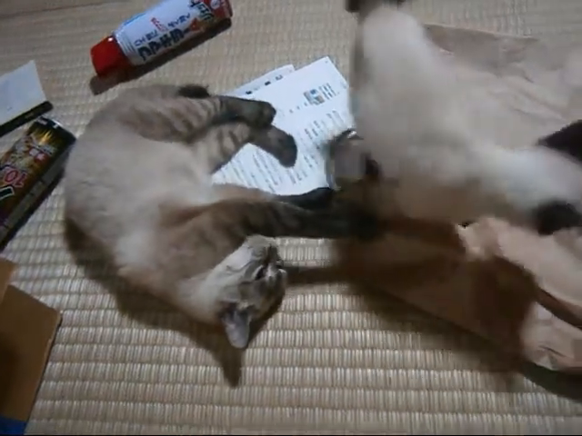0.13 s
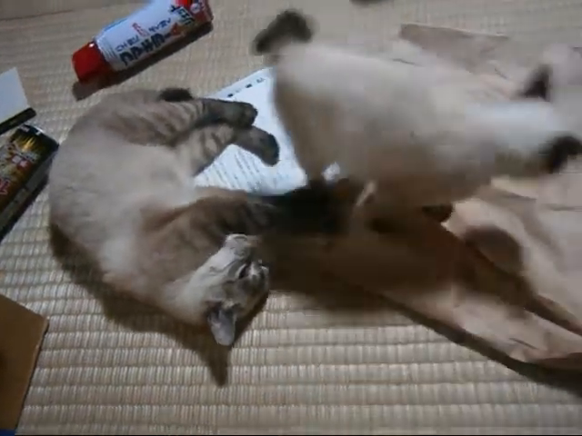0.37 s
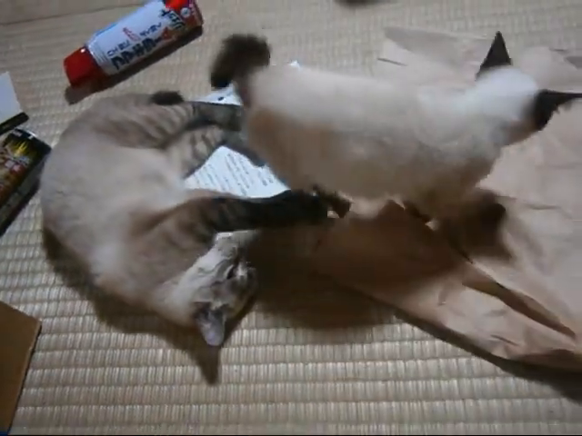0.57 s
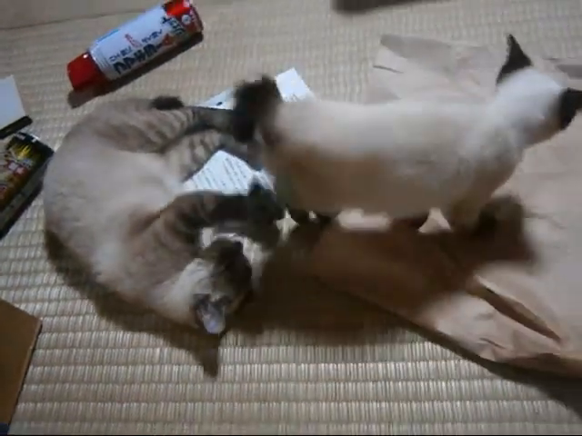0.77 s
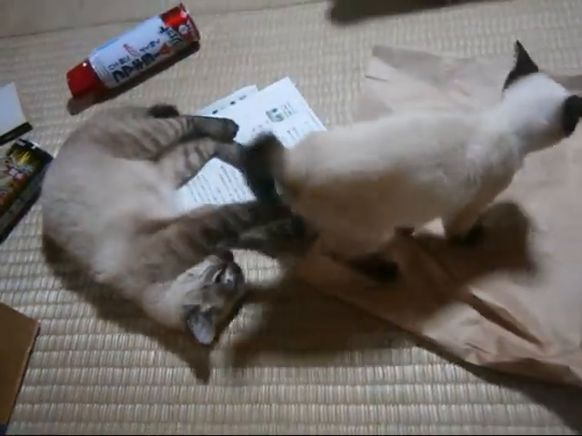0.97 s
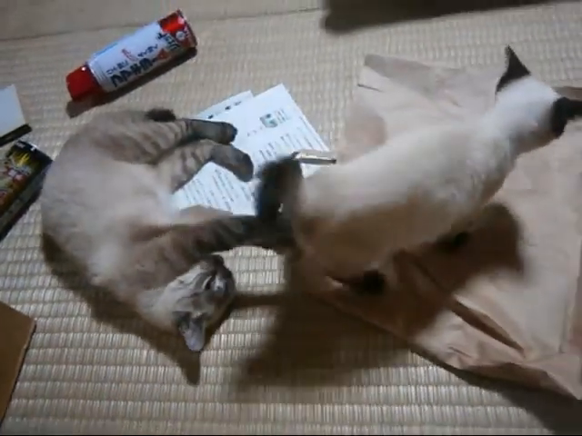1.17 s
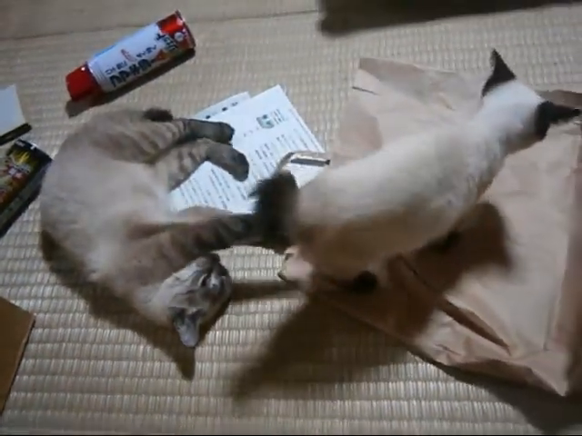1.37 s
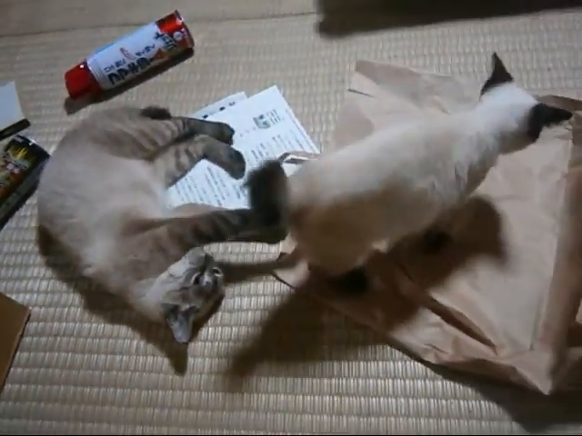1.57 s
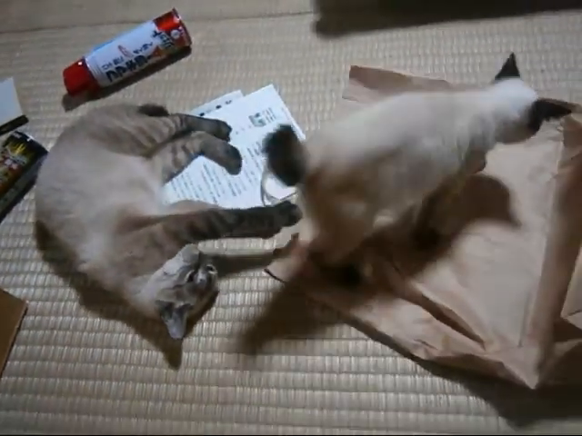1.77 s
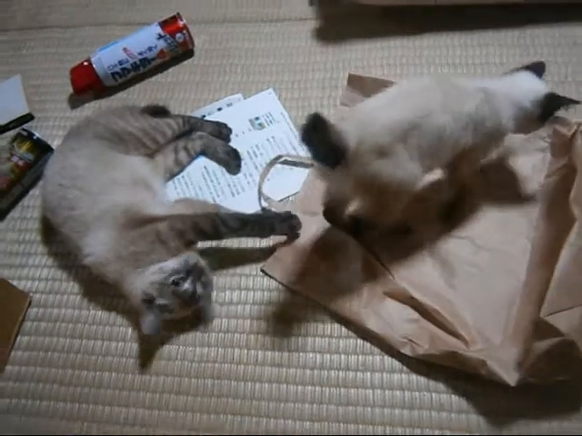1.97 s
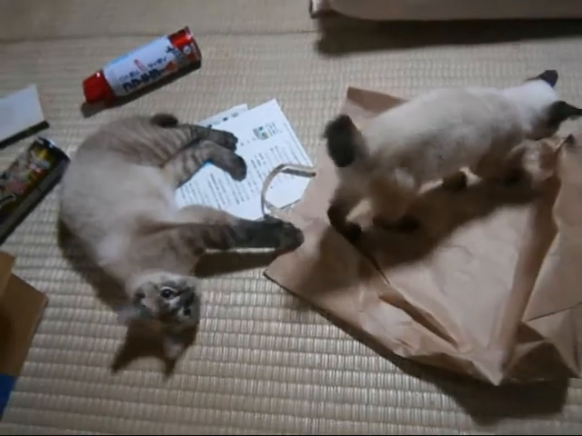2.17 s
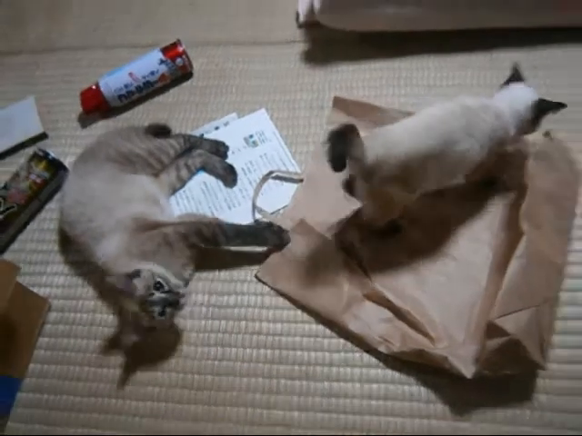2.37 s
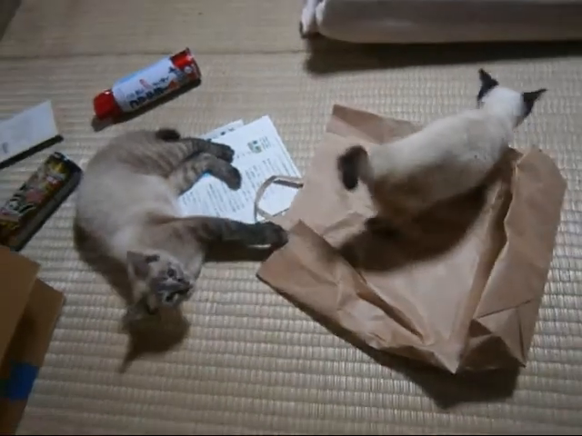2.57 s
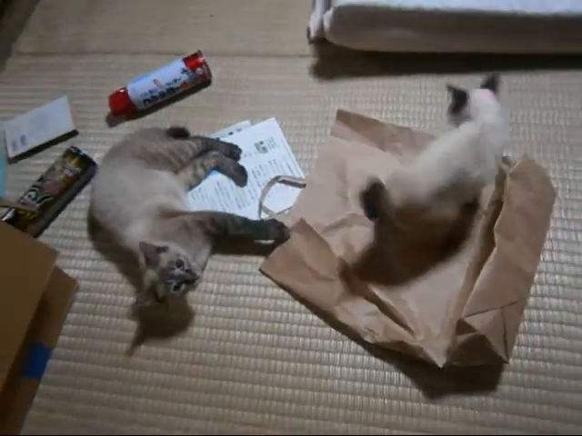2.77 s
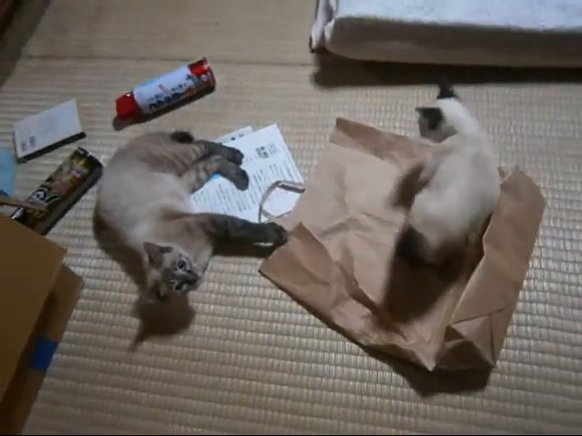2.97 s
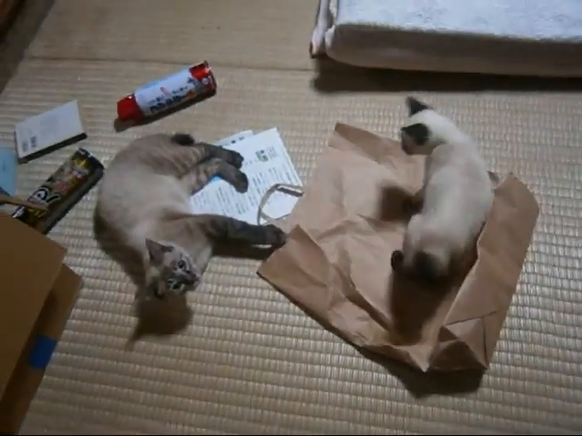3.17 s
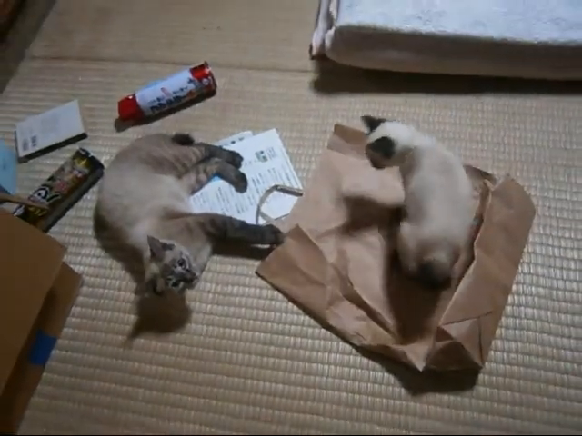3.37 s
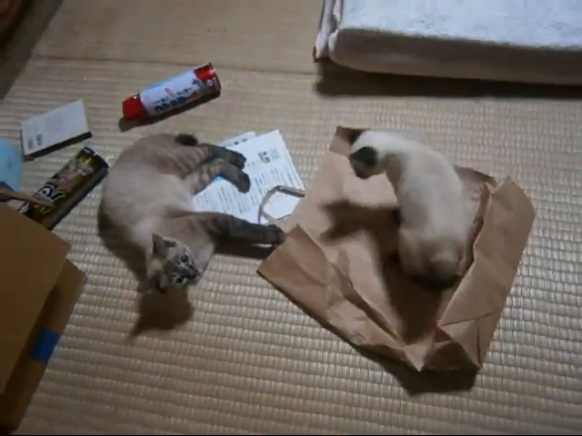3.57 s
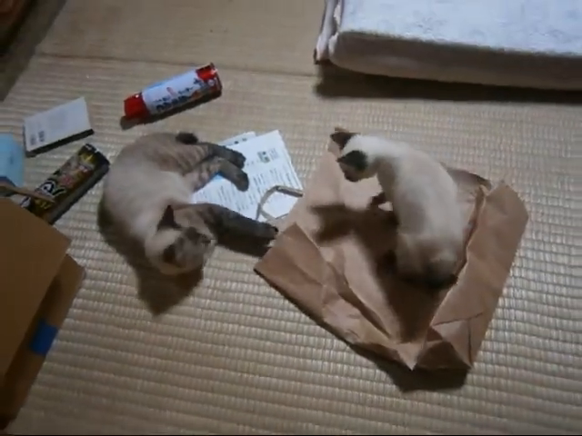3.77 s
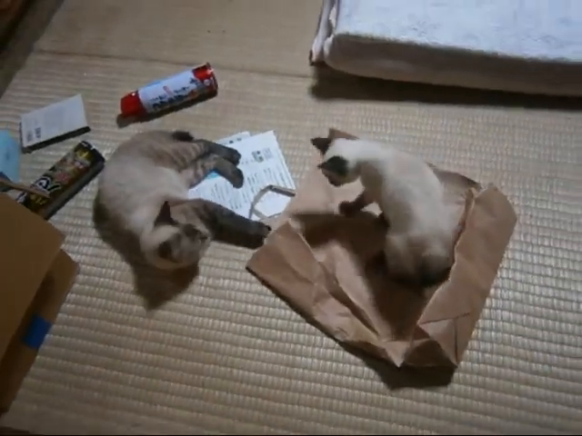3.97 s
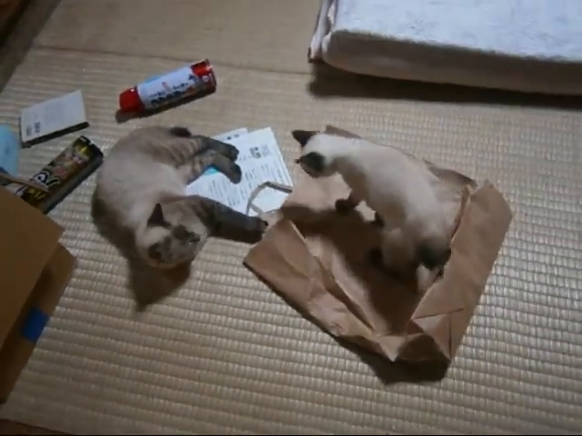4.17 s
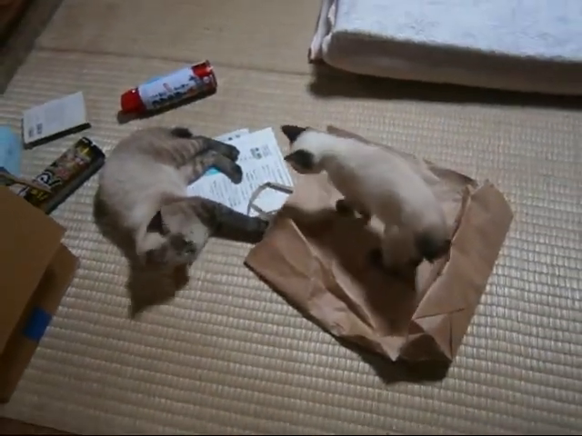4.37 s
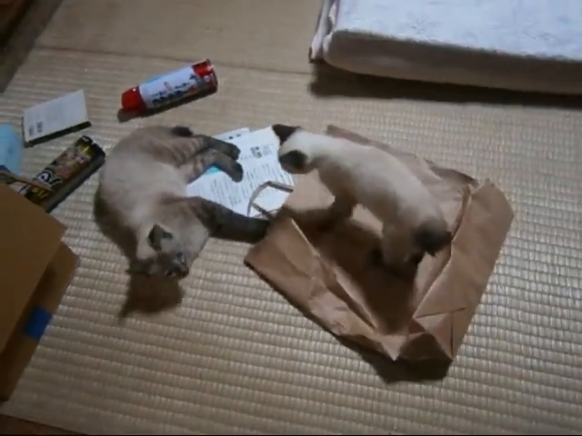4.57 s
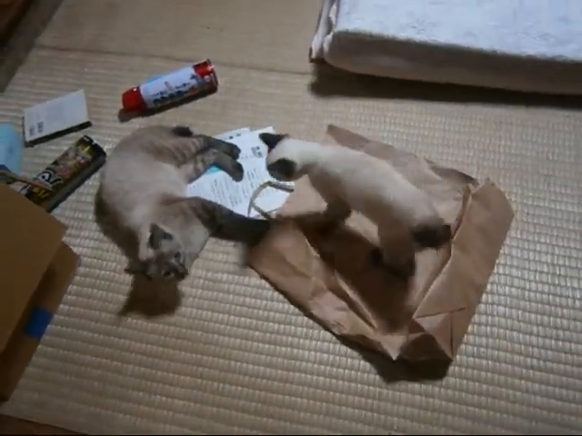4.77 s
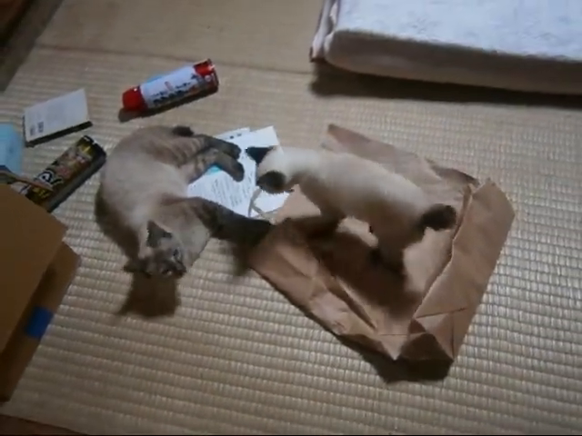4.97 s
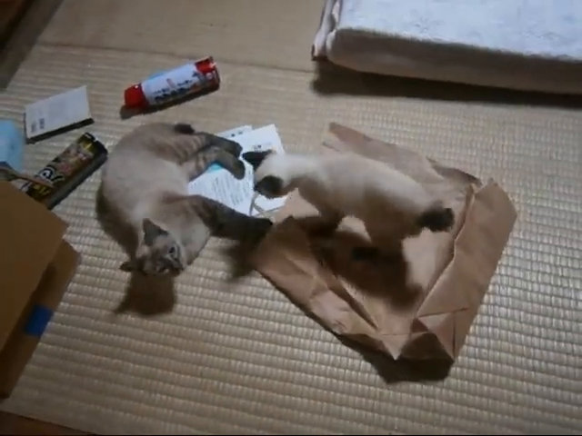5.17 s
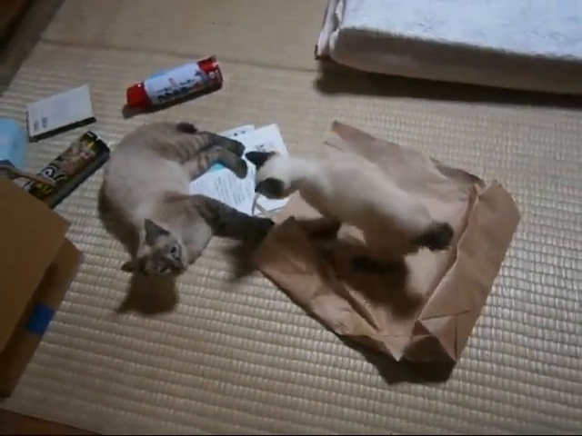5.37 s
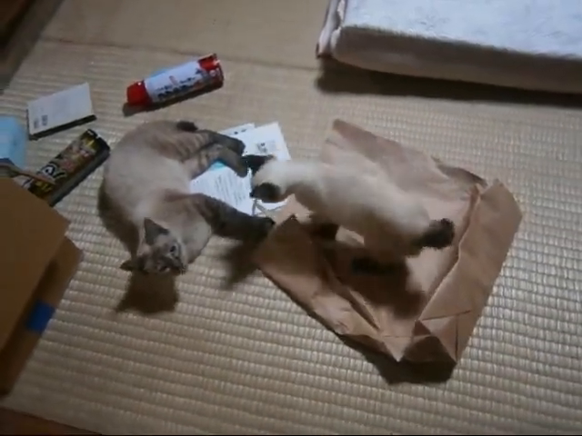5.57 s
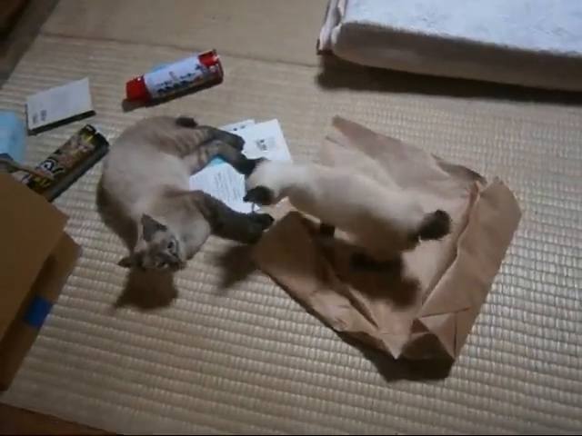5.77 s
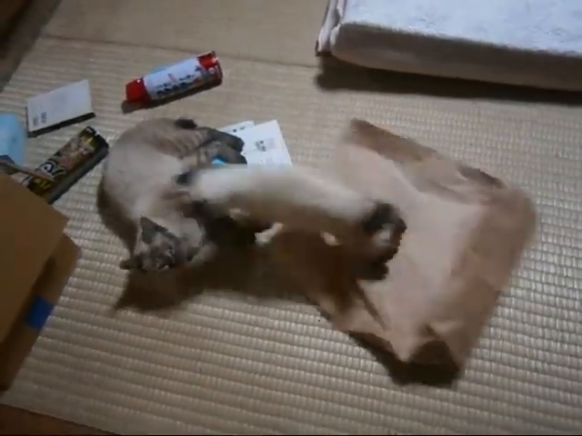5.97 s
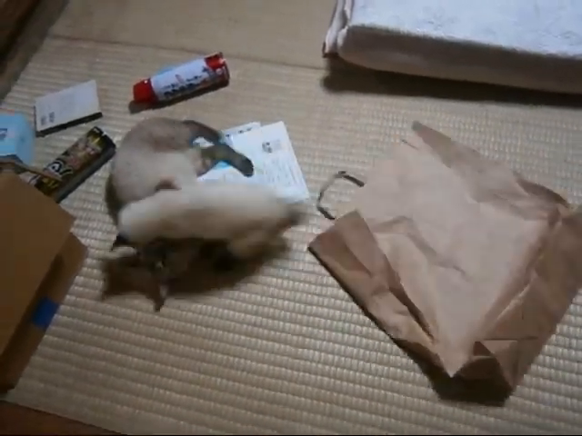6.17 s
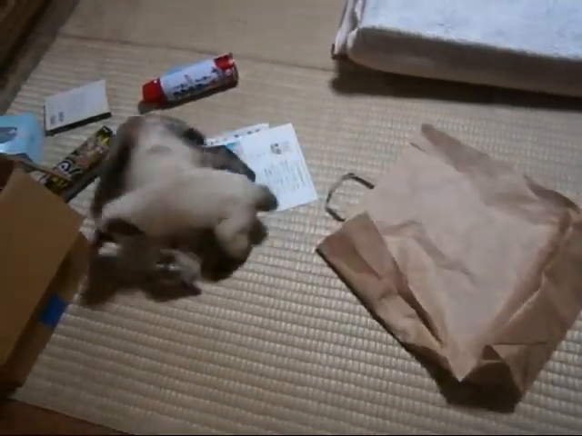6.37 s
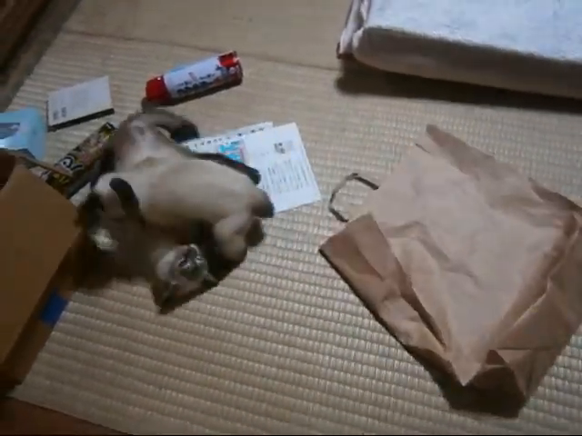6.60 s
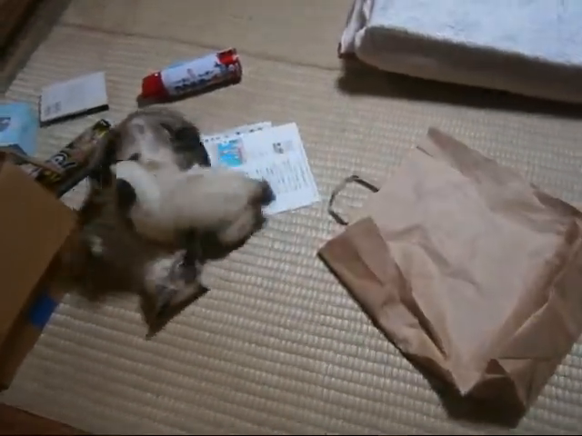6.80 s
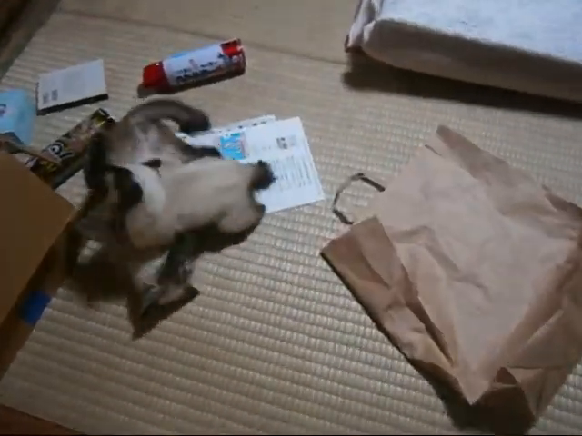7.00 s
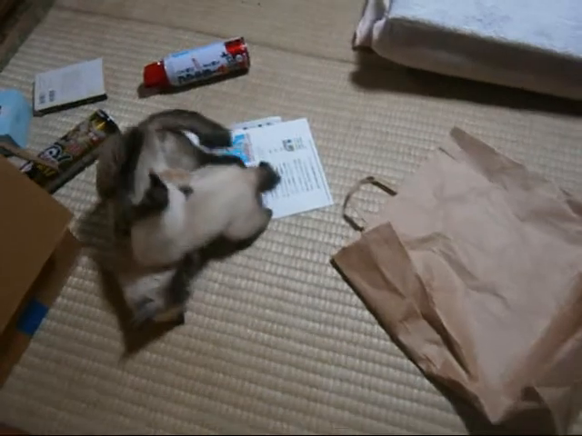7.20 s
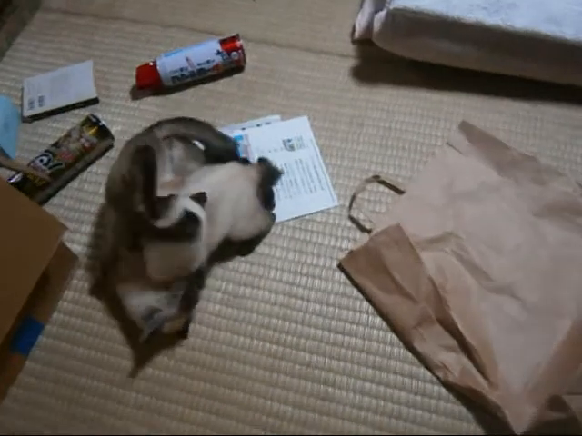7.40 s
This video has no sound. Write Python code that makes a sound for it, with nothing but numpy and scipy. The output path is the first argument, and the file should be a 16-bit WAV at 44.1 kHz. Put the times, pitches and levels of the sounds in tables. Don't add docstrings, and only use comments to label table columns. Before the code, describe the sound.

Crisp paper pops and rustles under small paws indoors, a quiet pause, more crackles, then a short scraping rush and soft landing.

```python
import sys
import numpy as np
from scipy import signal
from scipy.fft import rfft, irfft
from scipy.io import wavfile
from scipy.ndimage import uniform_filter1d

SR = 44100
rng = np.random.default_rng(int(sys.argv[2]) if len(sys.argv) > 2 else 0)


def unload_wav(signal):
    wavfile.write(
        sys.argv[1],
        SR,
        np.round(np.clip(np.atleast_2d(signal).T, -1, 1) * 32767).astype(np.int16),
    )


def invert_db(x):
    u = np.asarray(x, float) / 20
    return 10 ** u


N = 328104

# (frequency [Hz], density [dB per Hz])
HUM_SPECTRUM = [(20, -17), (50, -9.5), (110, -3), (200, -1), (400, -2.5), (800, -8), (1600, -13.5),
                (3000, -16), (5000, -17.5), (6300, -19.5), (8500, -19), (11500, -17.5), (12300, -21.5),
                (16000, -19)]
# (frequency [Hz], width [Hz], level [dB])
MIC_RESONANCES = [(7590, 770, -56.5), (10900, 1700, -64)]
# (frequency [Hz], width [Hz], level [dB], throb depth [0-1])
INSECTS = [(3834, 390, -65.5, 0.6)]
# (time [s], level [dB])
CHORUS_SWELL = [(0, 3.5), (1, -3), (1.6, 4), (2.5, 4), (3.5, 5), (4.5, 3.5), (5.5, 6), (6.3, -3),
                (6.7, -18), (7, 0), (7.44, 2)]
# (time [s], level [dB])
CRICKET_LEVEL = [(0, -72), (1.2, -72), (2.2, -69), (3, -73), (3.8, -68), (5.5, -68), (6.2, -72), (7, -70),
                 (7.44, -68)]
# (loudest time [s], length [ms], level [dB], tilt from sheet to fibre hiss [dB])
RUSTLES = [(.01, 42, -51.5, -2), (0.345, 70, -50, -1.5), (0.419, 88, -53, 4), (.625, 61, -50, .6),
           (0.658, 30, -42, -2.5), (0.704, 71, -45, -3), (1.004, 41, -49, 3.5), (1.055, 88, -53, -4),
           (1.487, 71, -52.5, 0), (1.954, 82, -50, -.6), (2.03, 60, -59, 2.5), (2.131, 120, -51.5, -4.5),
           (2.548, 57, -48.5, -3), (2.6, 60, -54, -4), (2.921, 46, -50, 1.2), (3.06, 55, -52, 6),
           (3.103, 60, -47, -3), (3.283, 43, -49, 2), (3.578, 54, -49, 2), (4.779, 74, -51.5, -1),
           (5.125, 45, -51.5, -6), (6.25, 36, -52.5, 7), (5.273, 30, -46, 1.5), (5.86, 38, -54, -5),
           (5.91, 40, -54, -10), (6.31, 54, -55.5, -2), (6.38, 63, -51.5, 1.2), (6.8, 320, -57.5, 2),
           (6.93, 170, -53, -1.5), (7.086, 104, -53, -0.5)]
# (time [s], peak [dB], pitch [Hz], crispness [dB])
TICKS = [(0.212, -27.5, 9520, -14), (0.4074, -29, 9500, -17), (0.2014, -31, 9300, -18),
         (0.6284, -29, 10300, -18), (0.6355, -34, 7020, -12), (0.6934, -24, 10800, -15),
         (0.7033, -19, 7770, -7.5), (1.061, -27, 7400, -7), (1.7745, -22.5, 9300, -19),
         (1.9046, -32, 9030, -11), (2.0288, -36.5, 7780, 1), (2.1221, -30, 10300, -17),
         (2.147, -36, 7730, -13), (2.6358, -26, 7900, -9.5), (2.829, -20, 7040, -7),
         (2.8579, -25.5, 9900, -7), (2.881, -32, 7670, -9), (2.9063, -33.5, 7630, -5),
         (3.0875, -27, 6970, -19), (3.1014, -27, 7140, -14), (3.2084, -41, 7150, -5),
         (3.2889, -30, 10800, -15), (3.3265, -33, 7670, -3), (5.6775, -32, 10600, -11),
         (5.8187, -36, 7700, -5), (5.8354, -33, 6880, -5), (6.212, -26, 6700, -20), (6.38, -37, 9000, -19),
         (6.9337, -30, 6960, -13), (7.0504, -27, 10100, -10)]
# (time [s], sheet peak [dB], sheet pitch [Hz], crispness [dB])
SMALL_CREASES = [(0.336, -43, 1080, -2), (0.373, -36, 1450, -7.5), (0.417, -38, 1250, -5),
                 (0.441, -44, 1180, 5.5), (0.601, -43.5, 1650, -1), (0.701, -38, 1750, 0),
                 (0.82, -30, 1060, -12.5), (1.793, -32, 1130, -5), (1.937, -43, 1200, -1),
                 (1.955, -38, 1620, -8), (2.523, -38.5, 1500, -5), (2.925, -34, 1190, -12),
                 (4.193, -50, 738, 2), (5.841, -36.5, 1680, -6), (6.057, -23, 950, -8),
                 (6.069, -23, 1000, -11), (6.934, -36, 1300, -9), (6.939, -37, 1280, -3.5)]
# (time [s], sheet peak [dB], sheet pitch [Hz], crispness [dB])
POPS = [(0.657, -29.5, 1340, -13), (0.699, -25.5, 1140, -9), (0.994, -29, 1320, -8.5),
        (1.054, -28.5, 1270, -4), (1.078, -33, 850, -14), (1.247, -27.5, 1250, -12),
        (1.377, -36, 1020, -21), (1.481, -34, 1000, -9), (2.097, -33.5, 1230, -10), (2.111, -38, 1050, -12),
        (2.159, -42, 616, -12), (2.188, -32, 1590, -18), (2.351, -26, 706, -12), (2.543, -26.5, 1110, -12),
        (2.572, -28, 1200, -24), (2.822, -18, 1036, -13), (3.105, -31.5, 660, -7), (3.271, -30, 1420, -20),
        (4.865, -33.5, 890, -26), (5.098, -35, 744, -16), (5.14, -19, 880, -14), (5.155, -24, 1100, -24),
        (5.177, -31, 855, -23), (5.185, -32, 1090, -21), (6.207, -29, 730, -13), (6.765, -36.5, 940, -12),
        (6.998, -50, 926, -9), (7.05, -31, 690, -13)]
# (time [s], sheet peak [dB], sheet pitch [Hz], pitch of the stiff panel beside it [Hz], crispness [dB])
TEARS = [(0.74, -19, 1530, 3720, -5), (1.036, -23, 1180, 3900, -7), (1.135, -16, 1620, 2840, -5),
         (1.773, -19, 1325, 3050, -16), (1.82, -18, 1190, 2620, -15), (2.25, -11.5, 1280, 3360, -1.5),
         (4.964, -24, 866, 2660, -11.5), (5.854, -38, 947, 2820, -0.5)]
FOLDS = [(1.188, -19.5, 1500, 3150, -2.5), (1.281, -16, 1186, 3280, -11), (1.445, -31, 1110, 2890, -8.5),
         (2.811, -19.5, 1020, 2000, -6.5), (3.194, -15.5, 1154, 3740, -9.5), (3.343, -23, 815, 1820, -21),
         (5.122, -24, 1020, 2720, -11), (5.143, -17, 1090, 3820, -7), (7.372, -46, 783, 2800, 5)]
# (time [s], peak [dB], pitch [Hz], ring [s])
THUDS = [(1.036, -27.5, 275, 0.021), (1.136, -22.5, 430, 0.041), (1.282, -25, 505, 0.082),
         (1.821, -27.5, 396, .05), (2.251, -23, 480, 0.032), (5.142, -26, 436, 0.07),
         (6.11, -27.5, 567, 0.043), (6.208, -57, 44.5, 0.17), (6.208, -30, 610, 0.043),
         (6.217, -27.5, 232, 0.035), (6.234, -26.5, 96, 0.029)]
# (time [s], peak [dB], pitch [Hz], ring [s])
WALL_RING = [(5.196, -38, 1200, 0.24)]
# (time [s], scraping level [dB])
SKID = [
    (5.9, -65),
    (5.94, -41.5),
    (5.975, -32.5),
    (6.01, -26.5),
    (6.045, -23.5),
    (6.078, -28),
    (6.11, -34),
    (6.17, -39),
    (6.24, -49),
]
# (frequency [Hz], width [Hz], level [dB])
SHEET = [(460, 870, -7), (940, 530, 2.5), (1250, 460, 4), (1750, 930, -6.5)]
CRACK = [(2876, 616, 5), (3785, 570, 3), (5680, 2800, -4.5)]
TICK = [(6990, 1300, 0.48), (9520, 2830, -2.1), (10600, 2050, -0.091)]
FINEST = [(13000, 2200, 0), (15000, 2000, -1)]
MAT = [(232, 300, -14.5), (920, 330, -2.5), (1500, 430, -8), (2000, 570, -11)]
WEAVE = [(2100, 610, -11)]
# (frequency [Hz], t60 [s], level [dB])
ROOM = [(308, 0.28, -20), (950, 0.45, -22.5), (3020, 0.24, -18.5), (8000, 0.24, -20.5)]
NOTE_WIDTH = (0.19, 0.17, 0.13, .12)

BUCKLE_MS, TICK_OVER_CRACK_DB = (1.53, 3.4, 2.9, 1.3), (-2, -12.5, 3, -4.5)
CRACK_TOP_DB, SETTLE_KIND_DB = (6.5, -5.5, 1.5, 2), (-2, -1, -3.5, 0.5)
SETTLE_DB, SETTLE_PER_CRISP, SETTLE_MS = (-13.5, -23, -28), (0.023, 0.41, 0.62), 17


def level(x, db):
    return x * invert_db(db) / np.sqrt(np.mean(x ** 2))


def band(x, hz, width):
    return signal.lfilter(*signal.iirpeak(hz, hz / width, fs=SR), x)


def colour(x, modes):
    out = 0
    for k, (hz, width, db) in enumerate(modes):
        out = out + (-1) ** k * invert_db(db) * band(band(x, hz, width), hz, 2 * width)
    return out


def walk(rate):
    hold = int(SR / rate)
    steps = np.repeat(rng.standard_normal(N // hold + 1), hold)
    return 1.32 * uniform_filter1d(uniform_filter1d(steps, hold), hold)[:N]


def add(out, s, burst, db):
    i = int(s * SR)
    out[i:i + len(burst)] += (burst * invert_db(db) / np.abs(burst).max())[:N - i]


def slips(power, modes, swing_db, share):
    size = invert_db(2.0 * np.minimum(rng.exponential(size=N), 5))
    grains = size * (rng.random(N) < share) * rng.standard_normal(N)
    return np.sqrt(power) * invert_db(swing_db) * level(colour(grains, modes), -2.45)


def buckling_creases():
    kinds = (TEARS, FOLDS, SMALL_CREASES, POPS)
    return [(*row[:3], row[-1], kind) for kind, rows in enumerate(kinds) for row in rows]


def sudden_noise(*shape):
    t = np.arange(2048) / SR
    return (1 - np.exp(-t / 0.00025)) * rng.standard_normal((*shape, 2048))


def hum_and_hiss():
    hz = np.fft.rfftfreq(N, 1 / SR)
    points_hz, points_db = np.transpose(HUM_SPECTRUM)
    shape = np.interp(np.log(hz + 1), np.log(points_hz), points_db)
    out = level(irfft(rfft(rng.standard_normal(N)) * invert_db(shape), N), -45.6)
    for f, width, db in MIC_RESONANCES:
        out += invert_db(0.81 * walk(9.6)) * level(colour(rng.standard_normal(N), [(f, width, 0)]), db)
    return out


def insects():
    t, out = np.arange(N) / SR, np.zeros(N)
    throb_hz, loudest_s = 3.68, 4.10
    cricket_hz, waver_hz = 5655, 16
    swell = invert_db(np.interp(t, *np.transpose(CHORUS_SWELL)))
    for f, width, db, depth in INSECTS:
        throb = 1 + depth * np.cos(2 * np.pi * throb_hz * (t - loudest_s))
        out += throb * swell * level(colour(rng.standard_normal(N), [(f, width, 0)]), db)
    song = np.sin(2 * np.pi * np.cumsum(cricket_hz + waver_hz * walk(60)) / SR)
    song_db = np.interp(t, *np.transpose(CRICKET_LEVEL)) + 1.5 * walk(30)
    return out + np.sqrt(2) * invert_db(song_db) * song


def camera_whine():
    whine_hz, whine_db = 14947, -58
    return np.sqrt(2) * invert_db(whine_db) * np.sin(2 * np.pi * whine_hz * np.arange(N) / SR)


def rustle():
    t, power = np.arange(N) / SR, np.zeros((3, N))
    for s, ms, db, tilt in RUSTLES:
        near = slice(max(int((s - .2) * SR), 0), int((s + .3) * SR))
        late = (t[near] - s) / (ms / 1000)
        shape = np.exp(-(late / np.where(late < 0, .25, .45)) ** 2)
        layers_db = db + np.array([-tilt, 0, tilt])
        power[:, near] += shape * invert_db(2 * layers_db + 3.5)[:, None]
    for s, db, _, crisp, kind in buckling_creases():
        near = slice(int(s * SR), int((s + .3) * SR))
        late = t[near] - s
        rise = 1 - np.exp(-(late / np.array([[.002], [.009], [.012]])) ** 2)
        fade = np.exp(-late / (SETTLE_MS / 1000))
        layers_db = db + SETTLE_KIND_DB[kind] + np.array(SETTLE_DB) + crisp * np.array(SETTLE_PER_CRISP)
        power[:, near] += rise * fade * invert_db(2 * layers_db)[:, None]
    bunch, out = walk(90), np.zeros(N)
    for p, modes, rough_db in zip(power, (SHEET, CRACK, TICK), (2.4, 2.1, 1.8)):
        out += slips(p, modes, rough_db * (0.45 * bunch + 1.03 * walk(170)), .14)
    return out


def claw_ticks():
    out, t = np.zeros(N), np.arange(2048) / SR
    fade = np.sqrt(t) * np.exp(-t / 0.001)
    for (s, db, hz, crisp), z in zip(TICKS, sudden_noise(len(TICKS), 2)):
        add(out, s, colour(z[0] * fade, [(hz, 2500, 0)]), db - 3.0)
        add(out, s, colour(z[1] * fade, CRACK), db + crisp + 3.0)
    return out


def crease_snaps():
    out, t, rows = np.zeros((2, N)), np.arange(2048) / SR, buckling_creases()
    runs = sudden_noise(len(rows), 2, 3)
    runs[:, :, 0, 8] = 9.0
    runs[:, :, 1, 8] = 3.5
    runs[:, 1, 1:, 8] = 7.0
    for (s, sheet_db, hz, crisp, kind), both in zip(rows, runs):
        life = t / (BUCKLE_MS[kind] / 1000)
        crack_db = sheet_db + crisp
        top_hz, top_width, top_db = CRACK[-1]
        crack = CRACK[:-1] + [(top_hz, top_width, top_db + CRACK_TOP_DB[kind])]
        tick_db = crack_db + .2 * crisp + TICK_OVER_CRACK_DB[kind]
        for way, z, sharp in zip(out, both, (NOTE_WIDTH[kind], .6)):
            sheet = [(hz, sharp * hz, 0), (.5 * hz, 400, -12), (1.34 * hz, 700, -8)]
            add(way, s, colour(z[0] * np.exp(-life / 1.53), sheet), sheet_db + 0.5)
            add(way, s, colour(z[1] * np.exp(-life), crack), crack_db + 7.0)
            add(way, s, colour(z[2] * np.sqrt(life) * np.exp(-life / 0.41), TICK), tick_db + 6.5)
    return out


def stiff_panels():
    out, t, rows = np.zeros(N), np.arange(2048) / SR, TEARS + FOLDS
    for (s, db, _, hz, crisp), z in zip(rows, sudden_noise(len(rows))):
        z[8] += 8.8
        add(out, s, colour(z * np.exp(-t / 0.0015), [(hz, 350, 0)]), db + crisp + 1.5)
    return out


def paper():
    out = crease_snaps()
    out[0] += claw_ticks() + stiff_panels()
    return signal.sosfilt(signal.butter(4, 12800, fs=SR, output="sos"), out)


def room(x):
    t = np.arange(SR // 2) / SR
    wall_s = 0.013
    rise = 1 / (1 + np.exp(-(t - wall_s) / 0.0036))
    uneven_db = 2.2 * rng.standard_normal(len(t) // 64 + 1).repeat(64)[:len(t)]
    scatter = rng.standard_normal((len(ROOM), len(t))) * invert_db(uneven_db)
    tail = np.zeros(len(t))
    for (hz, t60, db), z in zip(ROOM, scatter):
        tail += invert_db(db - 17.5) * band(z, hz, 1.1 * hz) * np.exp(-np.log(1000) * t / t60)
    return signal.fftconvolve(x, rise * tail)[:N]


def thuds():
    out, t, rows = np.zeros(N), np.arange(8192) / SR, THUDS + WALL_RING
    for (s, db, hz, t60), z in zip(rows, rng.standard_normal((len(rows), len(t)))):
        fade = np.exp(-np.log(1000) * t / t60)
        add(out, s, fade * (np.sin(2 * np.pi * hz * t) + level(band(z, hz, hz), -8)), db)
    return out


def skid():
    full_speed_db, mat_top_db, mat_lead_s = -25, -31.5, 0.0093
    scrape = np.interp(np.arange(N) / SR, *np.transpose(SKID), -120, -120)
    below = scrape - full_speed_db
    mat_db = np.minimum(np.roll(scrape, -int(mat_lead_s * SR)), mat_top_db)
    layers = [(mat_db, MAT, 1.0), (-24 + below, WEAVE + CRACK, 0.5),
              (-23.5 + 1.07 * below, TICK, 0.4), (-41 + 1.4 * below, FINEST, .5)]
    bunch, out = walk(110), np.zeros(N)
    for db, modes, rough_db in layers:
        out += slips(invert_db(2 * db), modes, rough_db * bunch + 0.4 * walk(190), .3)
    return out


def scene():
    still = hum_and_hiss() + insects() + camera_whine()
    (direct, to_walls), paws = paper(), thuds()
    mono = direct + paws + room(to_walls + paws) + rustle() + skid() + still
    return np.array([mono, mono])


def roll_off(x):
    return signal.sosfilt(signal.butter(12, 16980, fs=SR, output="sos"), x)


def record(dry):
    top = signal.ellip(14, .2, 80, 15760, fs=SR, output="sos")
    return roll_off(signal.sosfilt(top, dry) - .0096)


dry = scene()
out = record(dry)
unload_wav(out)
```